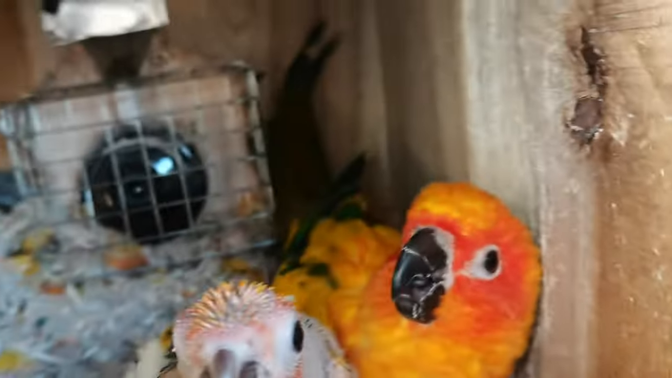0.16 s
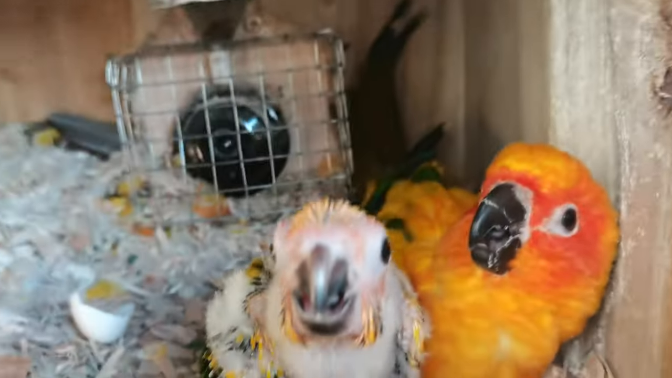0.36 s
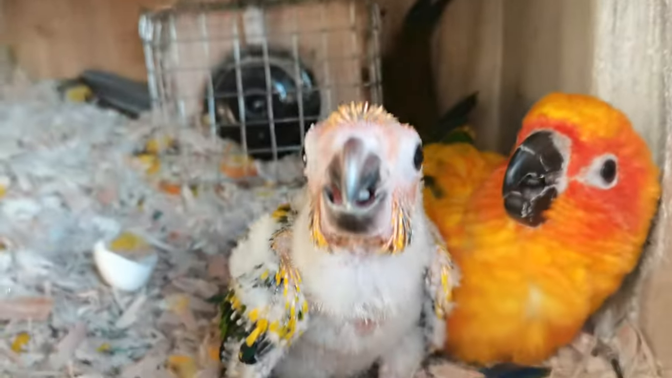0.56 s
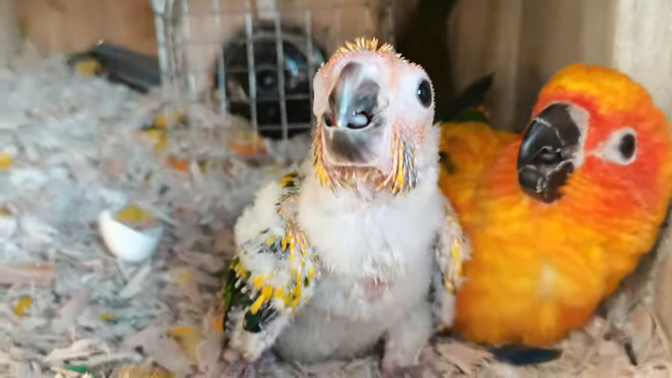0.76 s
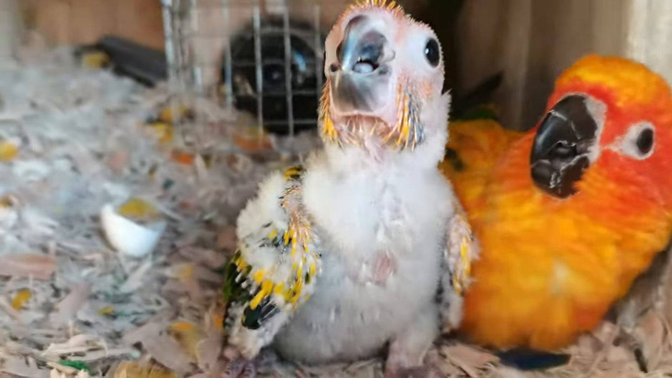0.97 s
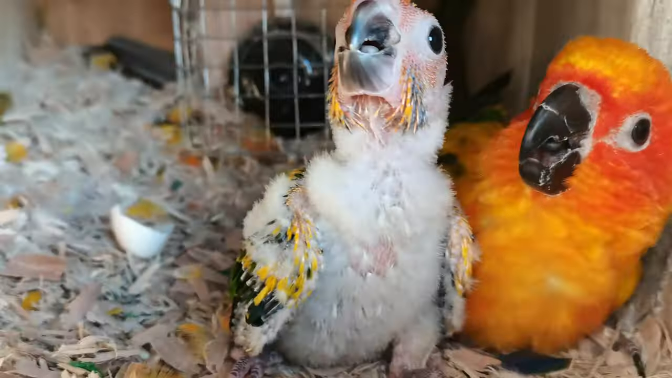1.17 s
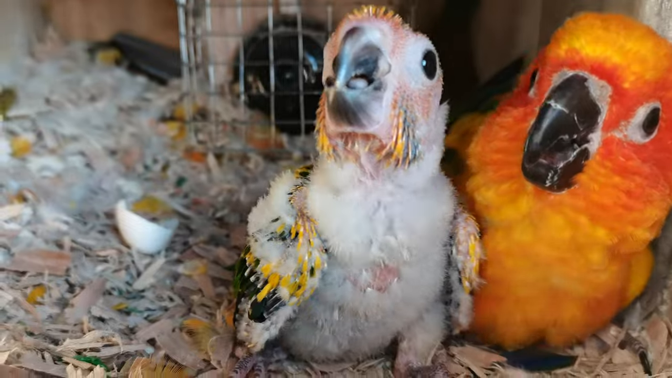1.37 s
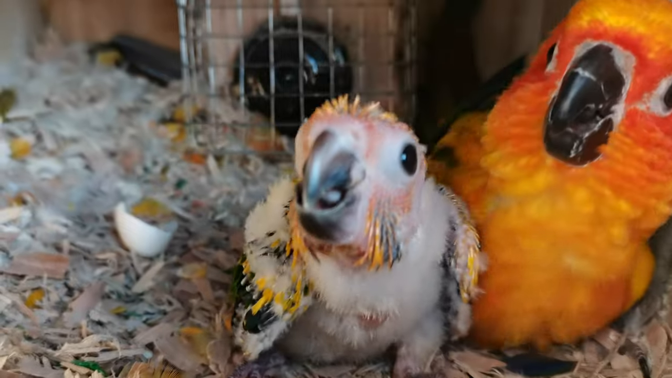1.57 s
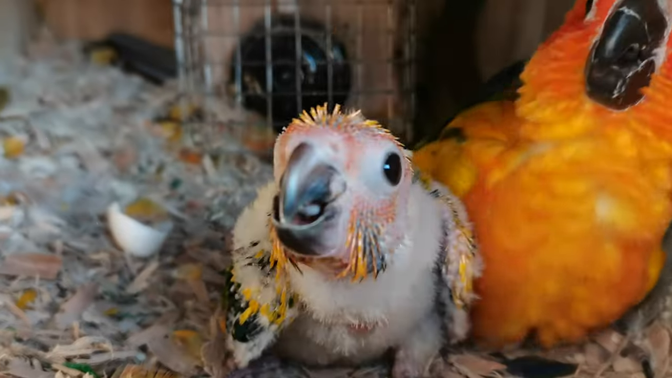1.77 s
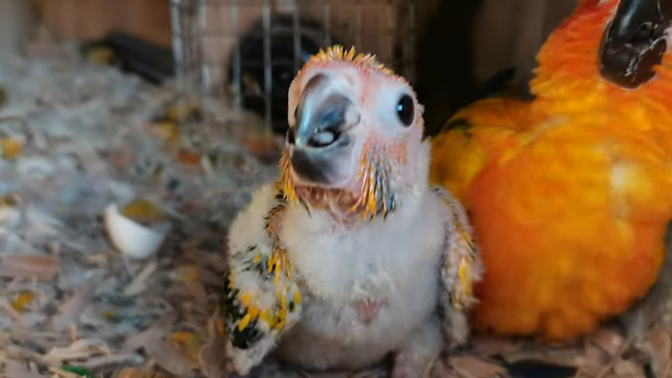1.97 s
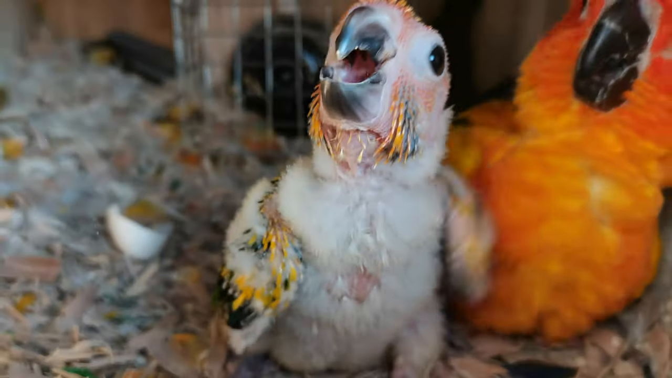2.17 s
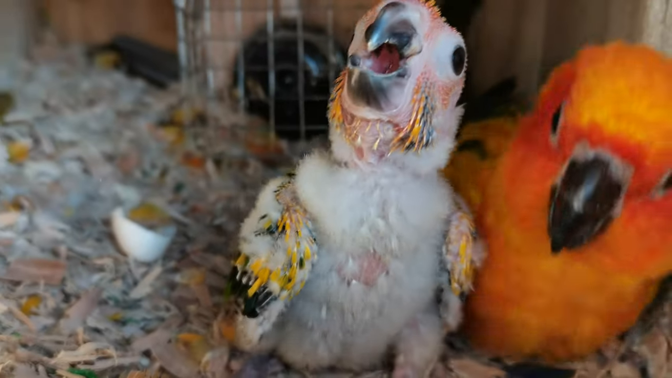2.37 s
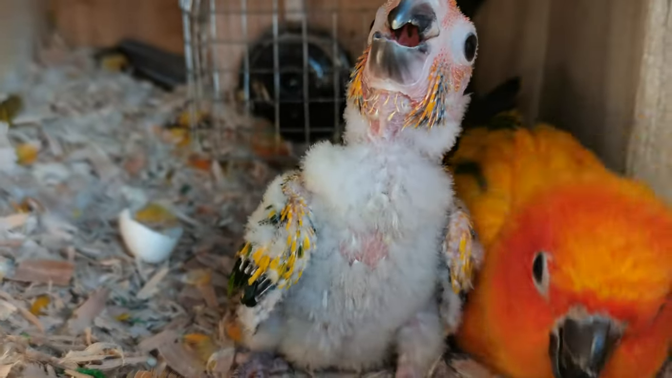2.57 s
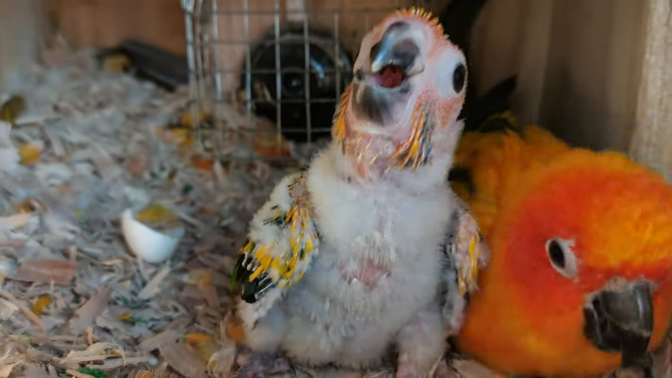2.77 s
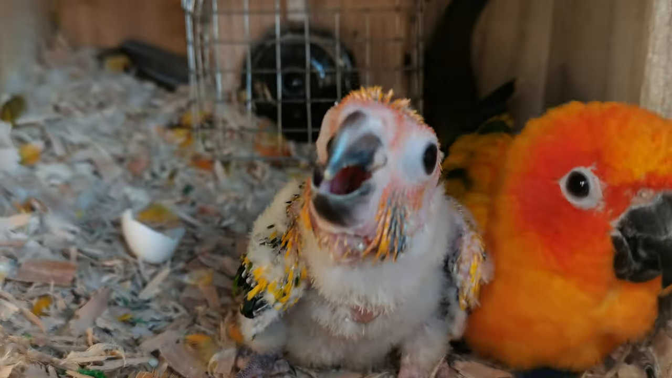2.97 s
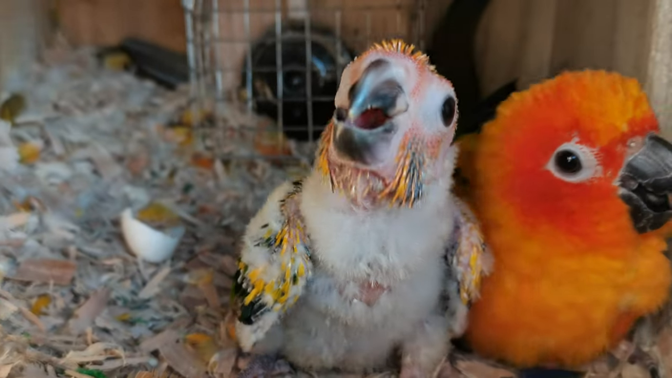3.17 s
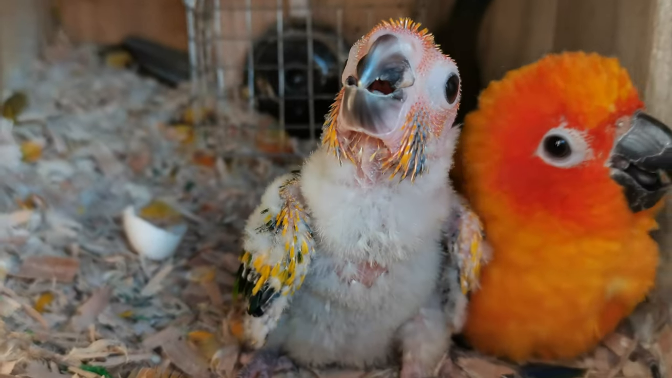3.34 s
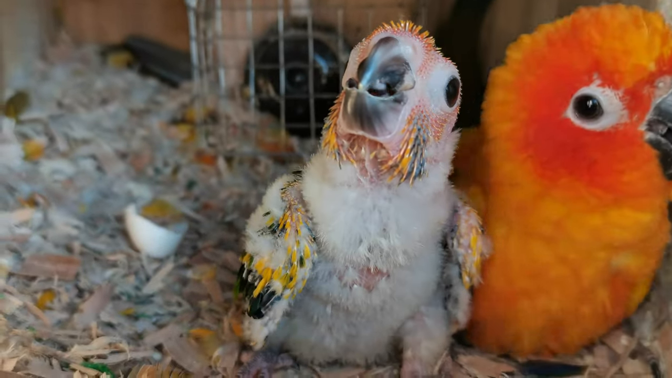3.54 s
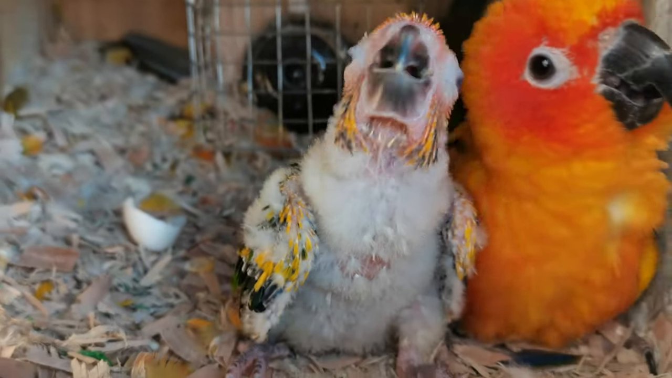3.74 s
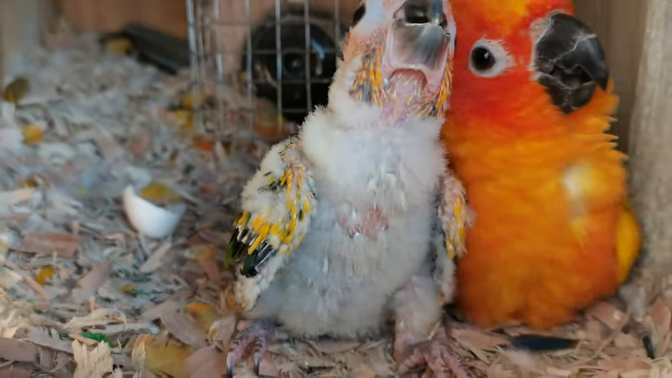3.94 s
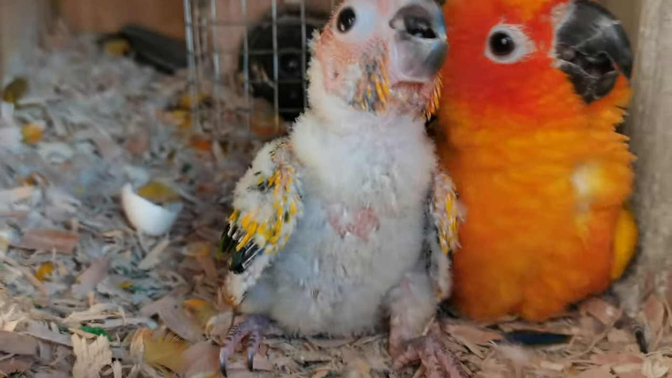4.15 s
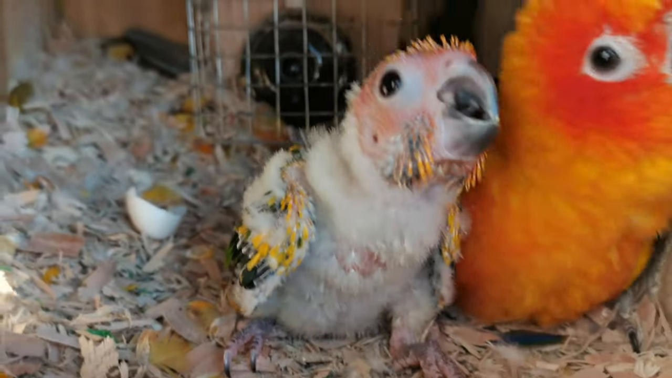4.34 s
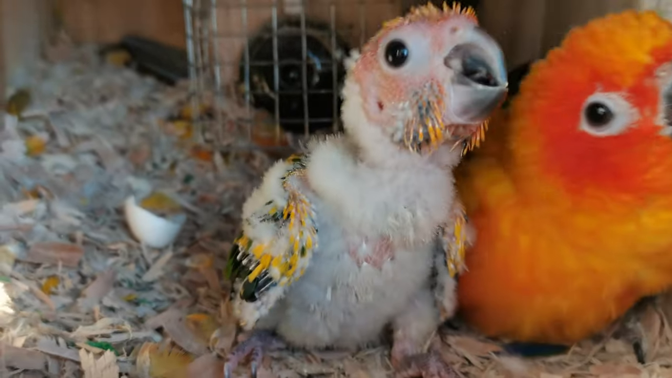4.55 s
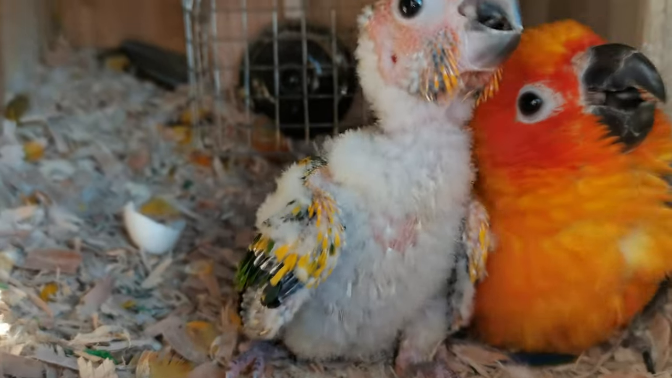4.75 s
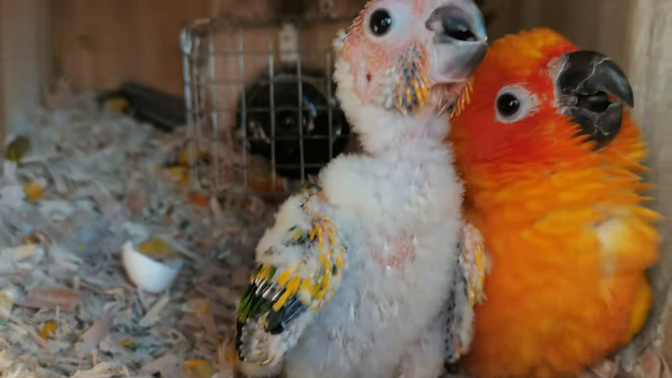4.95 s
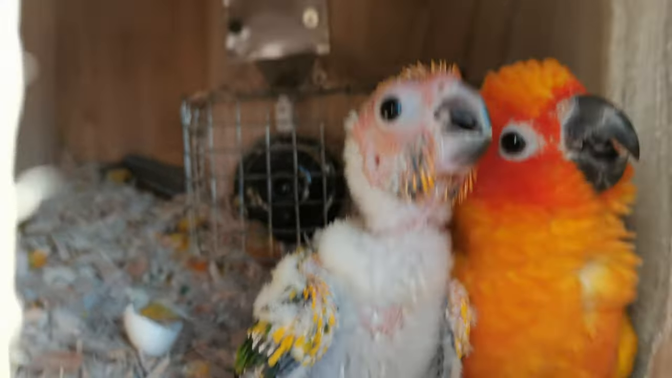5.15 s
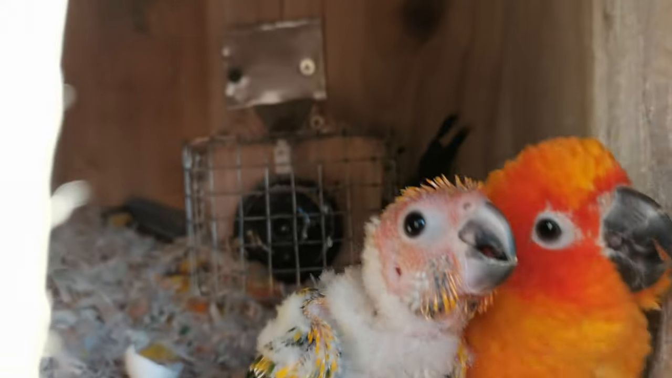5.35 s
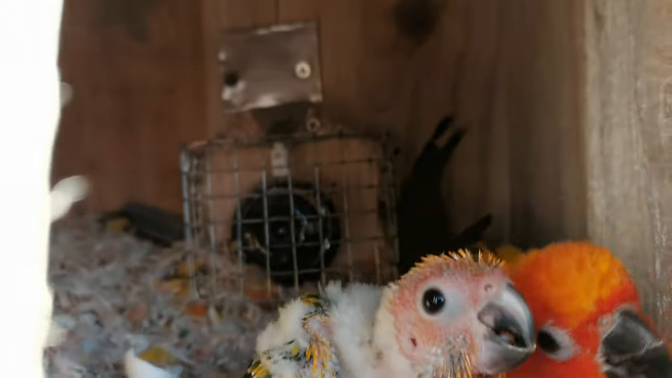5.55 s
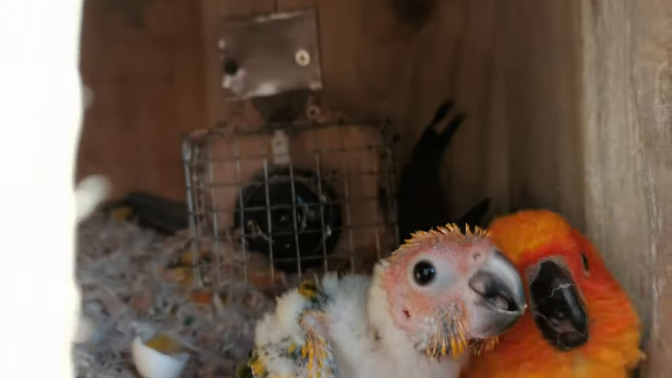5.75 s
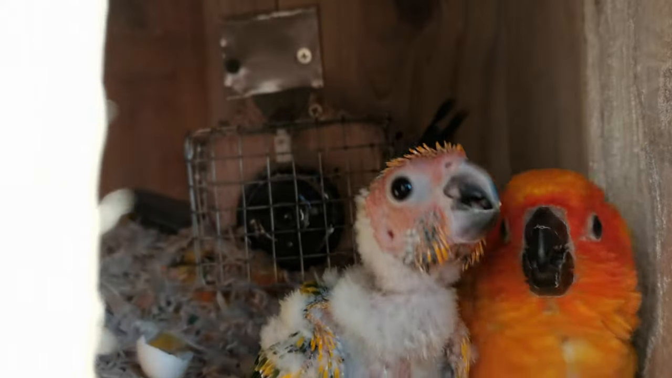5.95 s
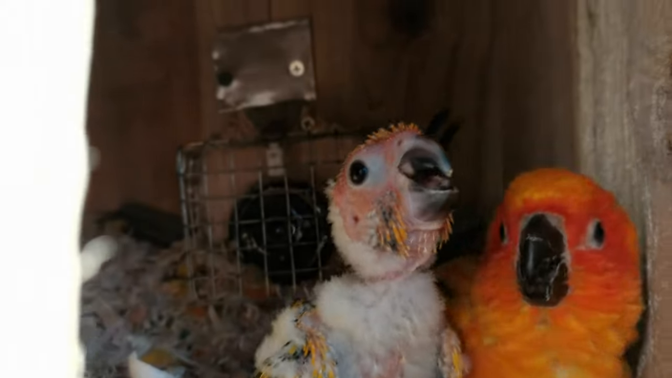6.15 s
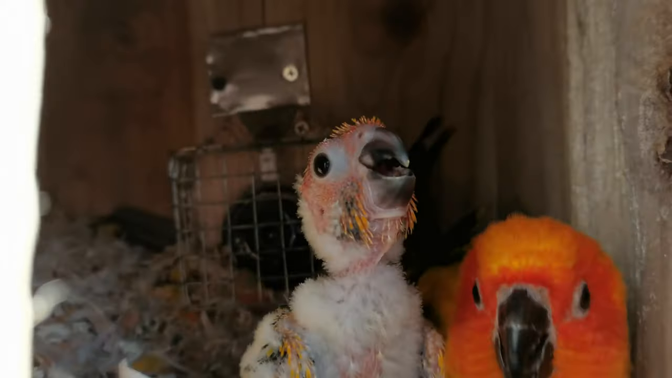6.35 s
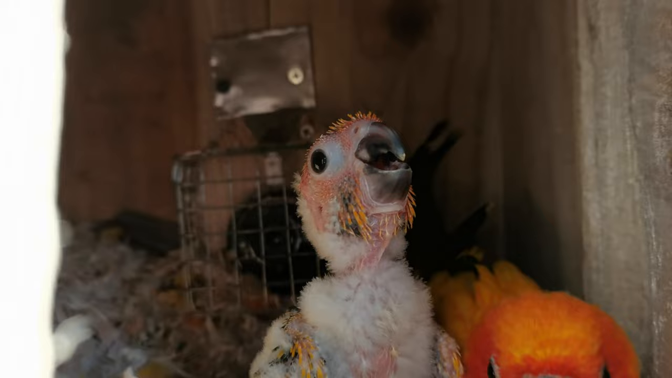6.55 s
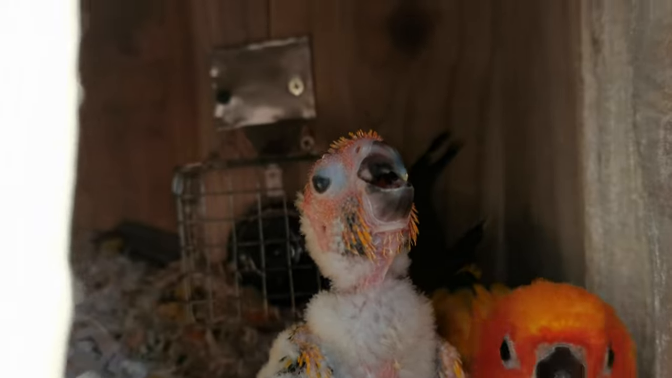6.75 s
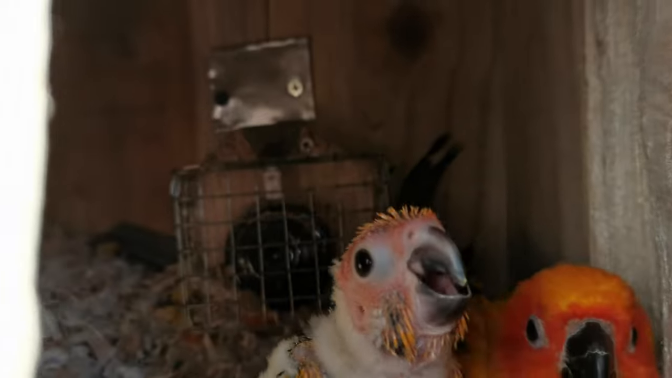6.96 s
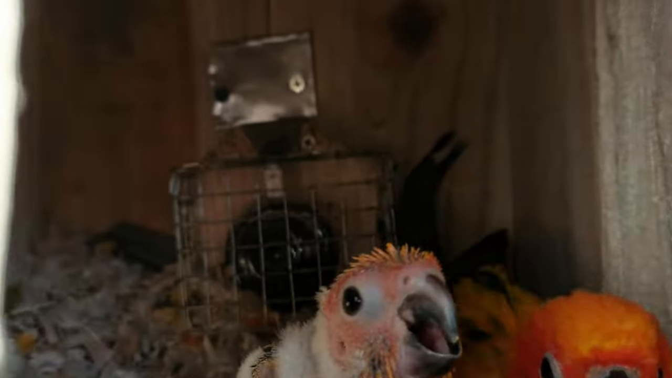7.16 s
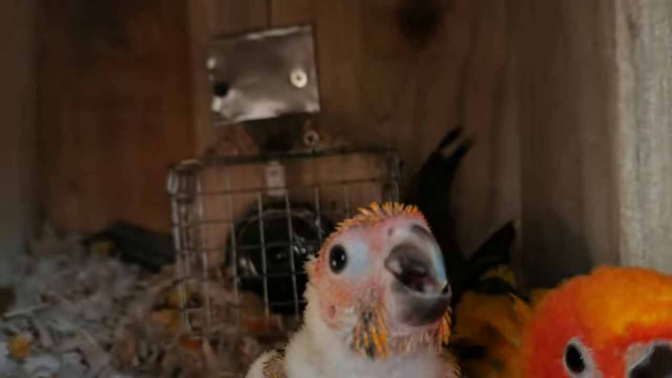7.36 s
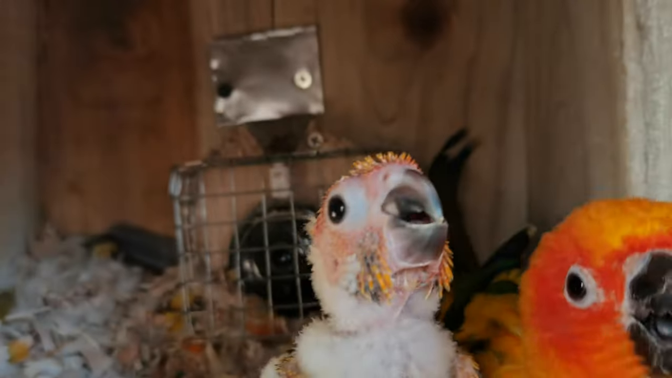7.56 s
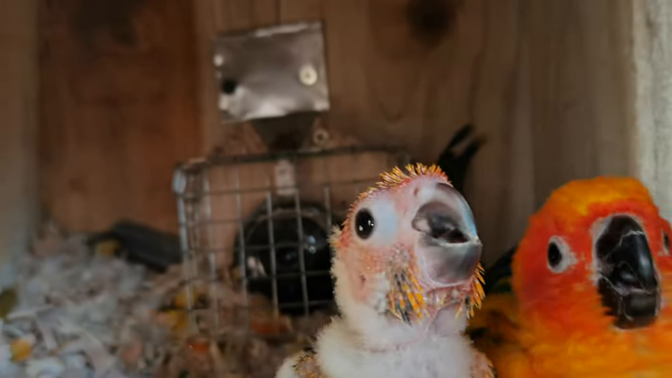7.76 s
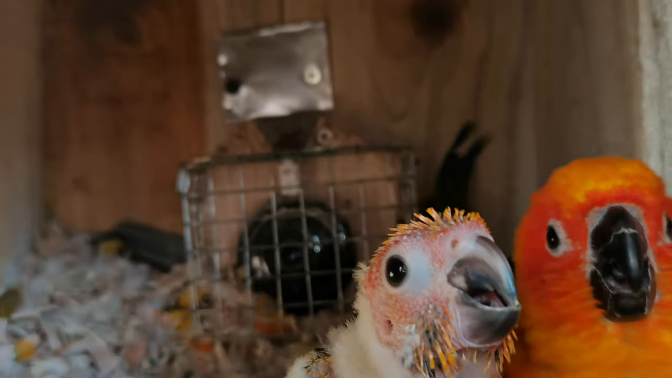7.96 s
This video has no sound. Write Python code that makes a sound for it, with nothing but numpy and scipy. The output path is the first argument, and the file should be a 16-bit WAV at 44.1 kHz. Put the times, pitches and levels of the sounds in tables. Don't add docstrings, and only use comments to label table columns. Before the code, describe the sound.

A parrot chick in a wooden nest box gives two bouts of fast hoarse begging rasps while an adult growls and other parrots screech far off.

```python
import sys
import numpy as np
from scipy import signal
from scipy.fft import rfft, irfft
from scipy.io import wavfile
from scipy.ndimage import uniform_filter1d, minimum_filter1d, map_coordinates

SR = 44100
rng = np.random.default_rng(int(sys.argv[2]) if len(sys.argv) > 2 else 0)


def unload_audio(sound):
    columns = np.transpose(np.atleast_2d(sound))
    steps = np.round(np.clip(columns, -1, 1) * 32767)
    wavfile.write(sys.argv[1], SR, steps.astype(np.int16))


def nominal_scale(level):
    x = np.asarray(level, float) / 20
    return 10 ** x


N = 353682
SNAP_S = 0.012


def times():
    return np.arange(N) / SR


def rms_one(x):
    return x / np.sqrt(np.mean(x ** 2) + 1e-20)


def follow(table):
    return np.interp(times(), *np.transpose(table))


def wobble(size, hz):
    noise = rng.standard_normal(size + 2000)
    return rms_one(signal.lfilter(*signal.butter(2, hz, fs=SR), noise)[2000:])


def resonance(x, hz, width):
    r = np.exp(-np.pi * width / SR)
    zeros = (1 - r * r) / 2 * np.array([1, 0, -1])
    return signal.lfilter(zeros, [1, -2 * r * np.cos(2 * np.pi * hz / SR), r * r], x)


def double_resonance(x, hz, width):
    return resonance(resonance(x, hz, width), hz, width)


def coloured(spectrum, alike):
    hz, db = np.transpose(spectrum)
    bin_hz = np.arange(N // 2 + 1) * SR / N
    gain = nominal_scale(np.interp(np.log(bin_hz + 1), np.log(hz), db, left=-90, right=-90))
    mid, side = irfft(rfft(rng.standard_normal((2, N))) * gain, N)
    alike = np.clip(alike, 0, 1)
    return rms_one(np.sqrt(1 + alike) * mid + np.sqrt(1 - alike) * side * [[1], [-1]])


def add(track, s, sound):
    at = round(s * SR)
    track[at:at + len(sound)] += sound[:N - at]


def bent(x, speed):
    return map_coordinates(x, [np.cumsum(speed * np.ones(len(x)))], order=3, mode="constant")


def rumble():
    # [time_s, level_db]
    rumble_level = [(0.0, -54.5), (0.94, -53), (8.02, -58.5)]
    # [frequency_hz, density_db per Hz]
    rumble_colour = [(20, -6), (45, -4), (85, -1), (150, -5), (220, -5.5), (300, -16), (420, -37)]
    return nominal_scale(follow(rumble_level) + 2.5) * coloured(rumble_colour, alike=0.83)


def far_air():
    # [time_s, level_db]
    air_level = [(0, -40), (.35, -52), (1, -48), (2, -48), (3.6, -44.5), (4.8, -44), (5.05, -52),
                 (5.3, -48), (5.6, -55), (5.9, -40), (7.6, -47.5), (8.02, -51.5)]
    # [frequency_hz, density_db per Hz]
    air_colour = [(1500, -12), (2500, 7), (5000, 3), (8000, 4), (11000, -6.5), (13000, -7), (15500, -24)]
    return nominal_scale(follow(air_level) + 1.94 * wobble(N, 23)) * coloured(air_colour, alike=0.019)


def street():
    # [time_s, level_db]
    street_level = [(0, -57.5), (.4, -52.5), (2, -52), (3.6, -55), (4.6, -60.5), (5.0, -52.5), (5.6, -56.5),
                    (6.302, -52.5), (8.02, -53.5)]
    # [frequency_hz, density_db per Hz]
    street_colour = [(300, -13.5), (450, -6), (700, -9), (1100, 0), (1500, -2.5), (2500, -2)]
    return nominal_scale(follow(street_level)) * coloured(street_colour, alike=0.12)


def motor():
    # [time_s, mean_hz, level_db, hunting_depth_hz]
    drone_marks = [(0, 142.9, -46, 7.5), (.7, 150, -44.5, 12.5), (2.7, 153, -45, 17), (3.05, 167, -44, 6.5),
                   (3.701, 166, -43, 5), (3.9, 149.9, -51, 3), (4.35, 139, -59, -1), (4.5, 138, -86, 2.5),
                   (6.0, 139.4, -76, -1.5), (6.2, 138.7, -53.5, -13), (6.58, 140.6, -41, -2),
                   (7.0, 161, -43.5, -2), (7.28, 147.8, -47.5, -2), (7.45, 133, -57, 3),
                   (7.7, 134, -70, 0.5)]
    # [time_s, level_db]
    low_tone = [(0.0, -67), (1.69, -44), (3.2, -73)]
    hunt_s, hunt_top_s, labour_db_per_hz = 0.54, 0.78, 0.12
    t = times()
    s, *columns = np.transpose(drone_marks)
    hz, db, depth_hz = [np.interp(t, s, column) for column in columns]
    hunt_hz = depth_hz * np.cos(2 * np.pi * (t - hunt_top_s) / hunt_s)
    level = nominal_scale(db - labour_db_per_hz * hunt_hz + 3.7 * wobble(N, 11.5))
    drone = level * np.sin(2 * np.pi * np.cumsum(hz + hunt_hz) / SR)
    low_level = nominal_scale(np.interp(t, *np.transpose(low_tone), right=-99))
    low = low_level * np.sin(2 * np.pi * 109.6 * t)
    sub_level = nominal_scale(-63.5 + 6.2 * wobble(N, 1.5))
    sub = sub_level * np.sin(2 * np.pi * np.cumsum(75.6 + 3.18 * wobble(N, 1.486)) / SR)
    return np.sqrt(2) * (drone + low + sub)


def aviary(x, wet_db):
    t60_s = 0.37
    t = np.arange(round(.6 * SR)) / SR
    decay = nominal_scale(-60 * t / t60_s) * np.minimum(t / 0.00097, 1)
    tail = rng.standard_normal((2, len(t))) * decay
    tail = tail / np.sqrt(np.sum(tail ** 2, axis=1, keepdims=True))
    return x + nominal_scale(wet_db) * signal.fftconvolve(x[None], tail, axes=1)[:, :N]


def shaky(hz, size, rough):
    turns = np.cumsum(hz * (1 + 0.01194 * wobble(size, 26.2)) + 55 * wobble(size, 570)) / SR
    skirt = rms_one(double_resonance(rng.standard_normal(size), hz, 600))
    return np.sin(2 * np.pi * turns) * (1 + 0.5 * wobble(size, 810)) + rough * skirt


def screech(size, hz, upper_db, upper_hz):
    breath = double_resonance(rng.standard_normal(size), 10080, 1900)
    breath = resonance(breath, 12700, 4200)
    rough = np.clip(nominal_scale(upper_db + 9.0), .1, .9)
    beak_hz = upper_hz * (1 + 0.01203 * rng.standard_normal())
    lines = [(hz * 0.92, upper_db - 22.0), (hz, 0), (beak_hz, upper_db), (hz * 1.5, upper_db - 7.5),
             (hz * 2, upper_db - 5.5), (hz * 2.5, upper_db - 15.5)]
    partials = sum(nominal_scale(line_db) * shaky(line_hz, size, rough) for line_hz, line_db in lines)
    return nominal_scale(upper_db - 3) * rms_one(breath) + partials


def flock():
    # [start_s, peak_db, second_partial_hz, brightness_db]
    dull_bird = [(0.0, -45, 4690, -4), (0.0718, -41.5, 4980, 0.5), (0.541, -31.5, 3980, -9),
                 (0.6386, -36.5, 4630, -4.5), (.7297, -39, 4740, -4.5), (1.2446, -44.5, 4234, -4.5),
                 (1.495, -51, 3930, -16), (3.098, -40, 4170, -6.5), (3.308, -40, 4220, -5),
                 (3.4392, -41.5, 4180, -13), (3.5034, -37, 4430, -3.5), (3.5742, -37, 4160, -2.5),
                 (3.7397, -48, 4620, 3.5), (3.8802, -49.5, 5440, -1.5), (4.0292, -42, 3935, -3.5),
                 (4.1763, -40, 4150, 4), (4.269, -43.5, 4480, 1.5), (4.414, -37, 5190, 0),
                 (4.553, -40, 5260, 0.5), (4.8002, -50, 5130, -2), (4.929, -52, 4000, -18),
                 (5.92, -37.5, 3790, -4), (6.32, -42.5, 4210, 2.5), (6.41, -48, 4430, -17),
                 (6.489, -33, 5050, -2), (6.721, -46, 4600, -6), (7.7196, -41.5, 3955, -13.5)]
    mellow_bird = [(5.389, -49, 4540, 1), (5.571, -66.5, 4560, 12), (5.71, -37.5, 4920, -2.5),
                   (5.8152, -34.5, 4234, -1.5)]
    middle_bird = [(0.168, -37.5, 5270, -7.5), (0.4283, -42, 3460, -3), (0.491, -43, 3425, -2.5),
                   (1.1276, -35, 4374, -12), (1.879, -50, 3520, -7), (6.609, -36, 5030, -10),
                   (7.541, -43.5, 3780, -0.5), (7.621, -41, 4550, -7.5)]
    shrill_bird = [(0.8143, -37, 4220, -6), (.92, -36.5, 4440, -8.5), (1.0051, -39.5, 4370, -50),
                   (1.066, -37.5, 4300, -11.5), (1.358, -40, 3840, -28), (1.6571, -50, 3820, 1),
                   (1.7553, -37, 4144, -5), (4.3761, -43.5, 4280, 4.5), (4.6697, -35, 5050, -6),
                   (5.114, -47.5, 4690, -6.5), (5.183, -38, 4360, -6), (7.404, -39.5, 4970, -5),
                   (7.4691, -40, 3920, -1), (7.966, -62, 4460, 6)]
    bird_upper_hz = [6025, 6580, 7020, 7690]
    # [start_s, peak_db, pitch_hz]
    flock_low = [(0.0722, -47, 2555), (0.1598, -52, 2230), (0.488, -53, 2414), (0.731, -52.5, 2427),
                 (0.921, -52, 3250), (1.2505, -54.5, 2146), (1.83, -51.5, 2240), (3.4998, -46.5, 2472),
                 (3.576, -42.5, 3087), (3.7447, -54, 2204), (4.0304, -60, 2890), (4.1635, -43.5, 2480),
                 (4.2698, -70, 2280), (4.3777, -41.5, 2603), (4.552, -48.5, 2580), (4.6782, -44.5, 2457),
                 (4.798, -50, 2560), (5.1785, -55, 2600), (5.7203, -59, 2017), (5.8238, -46, 2650),
                 (5.9195, -42.5, 3250), (7.4194, -48.5, 2456), (7.5278, -49.5, 2700), (7.619, -52, 2740)]
    rise, rise_s, sag_per_s = .1, .01507, .402
    out = np.zeros(N)
    t = np.arange(round(.13 * SR)) / SR
    shape = np.sin(np.pi / 2 * np.minimum(t / .024, 1)) ** 2 * np.exp(-(t / 0.05) ** 2)
    glide = 1.02 - rise * np.exp(-t / rise_s) - sag_per_s * t
    for calls, upper_hz in zip([dull_bird, mellow_bird, middle_bird, shrill_bird], bird_upper_hz):
        for s, db, hz, upper_db in calls:
            voice = screech(len(t), hz, upper_db, upper_hz)
            add(out, max(s - .01, 0), nominal_scale(db - 3.0) * shape * bent(voice, glide))
    for s, db, hz in flock_low:
        add(out, s - .01, nominal_scale(db - 1.5) * shape * bent(shaky(hz, len(t), rough=1.0), glide))
    return out


def nest_box(x, pan_db, lag_ms):
    # [delay_ms, gain]
    box = [
        [(1.3, 0.15), (2.9, -0.27), (5.1, 0.15), (8.3, -0.12)],
        [(.9, -0.59), (2.2, 0.14), (4.3, 0.36), (7.1, -0.44)],
    ]
    treble_pan_share = 0.53
    out = np.zeros((2, N))
    treble = signal.sosfiltfilt(signal.butter(2, 8550, "high", fs=SR, output="sos"), x)
    for port, (echoes, sign, late_ms) in enumerate(zip(box, [1, -1], [0, lag_ms])):
        heard = nominal_scale(sign * pan_db / 2) * (x - treble)
        heard = heard + nominal_scale(sign * treble_pan_share * pan_db / 2) * treble
        for ms, gain in [(0.0059, 1)] + echoes:
            lag = round((ms + late_ms) * SR / 1000)
            out[port, lag:] += gain * heard[:N - lag]
    return out


def scuff():
    start_s, length_s, level_db = .4, .069, -52.5
    rub = resonance(rng.standard_normal(N), 940, 800) * nominal_scale(4.3 * wobble(N, 60))
    return nominal_scale(level_db) * rms_one(rub) * np.exp(-((times() - start_s) / length_s) ** 2)


def claws():
    # [start_s, thud_db, pitch_hz, click_over_thud_db]
    knocks = [
        (0.307, -33, 210, -19),
        (0.357, -35, 210, -20),
        (0.423, -36, 223, -18),
        (4.818, -66, 252, -1),
        (4.948, -36.5, 306, -3),
        (7.963, -48.5, 410, 8.5),
    ]
    out = np.zeros(N)
    t = np.arange(round(0.07 * SR)) / SR
    for s, db, hz, click_db in knocks:
        click = double_resonance(rng.standard_normal(len(t)), 710, 2800) * np.exp(-t / 0.0079)
        thud = np.sin(2 * np.pi * hz * t) * np.exp(-t / 0.0083)
        add(out, s, nominal_scale(db) * (thud + 3 * nominal_scale(click_db) * click))
    return out


def beats(marks):
    beat_s = .0215
    marks = np.array(marks)
    number = np.cumsum(np.round(np.diff(marks[:, 0], prepend=marks[0, 0]) / beat_s))
    return [[np.interp(n, number, column) for column in marks.T] for n in np.arange(number[-1] + 1)]


def adult():
    # [time_s, peak_db, pitch_hz, overtones_db]
    growl_a = [(2.279, -26, 626, -12), (2.317, -20, 644, 1), (2.443, -18, 870, 1), (2.467, -18, 900, 3.5),
               (2.686, -17, 950, 7.5), (2.886, -18, 1024, 3.5), (3.085, -18.5, 1040, 9.5),
               (3.222, -20, 884, 8)]
    growl_b = [(6.724, -22, 1090, 2), (6.897, -14.5, 1000, 5), (7.024, -15, 960, 5.5),
               (7.202, -17, 940, 5.5), (7.271, -19, 896, 2), (7.298, -20, 920, -31), (7.392, -23, 900, -2)]
    # [time_s, peak_db]
    growl_end = [(3.267, -21.5), (3.286, -18.5), (3.307, -23), (3.36, -27.5), (3.375, -29), (3.381, -25),
                 (3.388, -23.5), (3.399, -23), (3.405, -22), (3.41, -20), (3.418, -27), (3.424, -21)]
    growl_tries = [(2.183, -32), (6.273, -41), (6.293, -23.5), (6.339, -32), (6.362, -25.5), (6.413, -28),
                   (6.522, -23), (6.549, -24.5), (6.665, -41)]
    # [pitch_hz, overtones_db]
    loose_throat = [(939, 7.5), (920, 7.5)]
    # [frequency_hz, width_hz, level_db]
    growl_partials = [(654, 424, -10), (900, 536, 2.5), (1178, 435, -0.5), (1995, 510, -8.5),
                      (2870, 510, -16), (3810, 730, -6.5), (4600, 1400, -7), (6050, 4000, -16),
                      (7100, 1650, -5.5), (10500, 720, -28.5)]
    pulses = np.full((2, N), 1e-18)
    k = np.arange(14)
    strength = np.exp(-((k - 2.2) / 1.67) ** 2) + 0.078 * (k > 3)
    loose = []
    for rows, throat in zip([growl_end, growl_tries], loose_throat):
        loose += [(*beat, *throat) for beat in rows]
    for s, db, pitch_hz, gape_db in beats(growl_a) + beats(growl_b) + loose:
        timing, force = rng.standard_normal((2, len(k)))
        at = (s + .0004 * timing[-1] + (k + 0.13 * timing) / pitch_hz) * SR
        burst = nominal_scale(db + 2.0 * force + 0.77 * rng.standard_normal()) * strength
        pulses[:, at.astype(int)] += burst * nominal_scale(np.array([[0], [gape_db]]))
    voice = np.zeros(N)
    for i, (hz, width, db) in enumerate(growl_partials):
        ring = double_resonance(pulses[int(i > 2)], hz, 1.18 * width)
        voice += (-1) ** i * nominal_scale(db) * SR / width * ring
    return nominal_scale(-16) * signal.sosfilt(signal.butter(2, 480, "high", fs=SR, output="sos"), voice)


def rasp(length, early_db, late_db, hz, chest_db, low_db, top_db, jitter, shake_db, hiss):
    # [share of second partial, width_hz, level_db]
    windpipe = [(0.536, 312, -4.5), (0.759, 770, -1), (.9, 600, 2), (1.022, 433, 3)]
    # [frequency_hz, width_hz, level_db]
    beak = [(5160, 2900, -13.5), (7530, 1400, -9.5), (9810, 1630, -11.5), (11090, 1500, -22.5),
            (14200, 1800, -21)]
    glide_up, glide_up_s, glide_down, glide_down_s = .1, .004, .1125, .006
    t = np.arange(round((length + 0.011) * SR)) / SR
    unsteady = 1 + jitter * wobble(len(t), 700) + .03 * wobble(len(t), 40)
    cycles = np.cumsum(hz / 2 * unsteady) / SR
    strong_weak = 1 + 0.3 * (-1) ** np.floor(cycles)
    pulses = np.diff(np.floor(cycles), prepend=0) * strong_weak * nominal_scale(shake_db * wobble(len(t), 1420))
    source = rms_one(pulses) + hiss * rng.standard_normal(len(t))

    modes = [(hz / 4, 350, chest_db)]
    modes += [(share * hz, width, gain_db) for share, width, gain_db in windpipe]
    modes += beak
    chance_db = rng.normal(0, 1.01, len(modes))
    chance_db[[0, 1, -1]] += [-14 * (length < SNAP_S), low_db, top_db]
    shift = 1 + 0.011 * rng.standard_normal(len(modes))
    voice = np.zeros(len(t))
    for k, (f, width, gain_db) in enumerate(modes):
        voice += (-1) ** k * nominal_scale(gain_db + chance_db[k]) * double_resonance(source, f * shift[k], width)

    slide = glide_up * np.exp(-t / glide_up_s) + glide_down * np.exp((t - t[-1]) / glide_down_s)
    voice = bent(voice, 1 - (length > SNAP_S) * slide)
    throb = nominal_scale(2.78 * wobble(len(t), 400))
    corners = np.array([0, .003, 0.0054 + 0.33 * length, 0.001 + 0.8 * length, 0.00091 + length,
                        length + 0.0062, length + 0.074])
    level_db = [early_db - 38, early_db - 5, early_db + 2, late_db + 1.5, late_db - 7.0,
                late_db - 18.0, late_db - 2]
    return rms_one(voice * throb) * nominal_scale(np.interp(t, corners, level_db))


def chick(calls, chest_db):
    # [time_s, second_partial_hz, neck_band_db, first_partial_db]
    chick_pitch = [(2.01, 3520, 4, -6), (2.032, 4300, -0.5, -5), (2.171, 4460, 2.5, 3.5),
                   (2.33, 4396, 2.5, 1), (2.48, 4330, 4, -0.5), (2.571, 4290, 8.5, -2), (2.7, 4180, 7.5, 2),
                   (2.88, 4214, 6.5, -0.5), (3.052, 4267, 4, -2.5), (5.98, 3590, 1, 2.5),
                   (6.07, 3997, -1.5, 1.5), (6.3, 3729, 0, 4.5), (6.521, 3760, -0.5, -2),
                   (6.669, 3798, -1.5, 1), (6.829, 3830, -3.5, -2), (6.99, 4054, 0, 0),
                   (7.14, 4210, -2, -3), (7.23, 4040, 3.5, -7)]
    # [time_s, level_db]
    whistle = [(2.01, -14), (2.3, -10), (2.5, 0.5), (3.05, 1), (5.98, -12), (6.25, -2.5), (6.5, 1),
               (7.0, 0.5), (7.1, -7), (7.23, -12)]
    out = np.zeros(N)
    marks, pitch_hz, neck_db, first_db = np.transpose(chick_pitch)
    for s, length, db in calls:
        swell_db = 0.8 if length > SNAP_S else -3.5
        half_db = (swell_db + rng.standard_normal()) / 2
        hz, low_db = np.interp(s, marks, pitch_hz), np.interp(s, marks, first_db)
        top_db = np.interp(s, *np.transpose(whistle))
        call = rasp(length, db - half_db, db + half_db, hz, chest_db, low_db, top_db,
                    jitter=.045, shake_db=3.0, hiss=.25)
        add(out, s - .003, call)
    neck_gain = nominal_scale(np.interp(times(), marks, neck_db)) - 1
    return out + neck_gain * resonance(out, 2920, 900)


def scene():
    # [start_s, length_s, level_db]
    rasps_a = [(2.010, 0.012, -35.5), (2.032, 0.0072, -26), (2.049, 0.0037, -46), (2.067, 0.0044, -34),
               (2.083, 0.0035, -49), (2.093, 0.0093, -32), (2.106, 0.011, -17.5), (2.119, 0.024, -26),
               (2.168, 0.047, -20), (2.247, 0.0066, -17.5), (2.259, 0.031, -19.5), (2.327, 0.038, -16.5),
               (2.406, 0.04, -17.5), (2.481, 0.04, -17.5), (2.564, 0.036, -18), (2.639, 0.04, -22),
               (2.721, 0.034, -19.5), (2.798, 0.042, -21), (2.878, 0.036, -19), (2.961, 0.037, -18),
               (3.041, 0.037, -18)]
    rasps_b = [(5.980, 0.021, -35.5), (6.004, 0.021, -26), (6.067, 0.025, -20), (6.130, 0.038, -21.5),
               (6.207, 0.036, -20.5), (6.286, 0.038, -22), (6.360, 0.042, -21), (6.442, 0.036, -17.5),
               (6.515, 0.037, -18.5), (6.595, 0.039, -16), (6.674, 0.038, -16.5), (6.751, 0.037, -14.5),
               (6.828, 0.033, -15), (6.904, 0.035, -14), (6.982, 0.029, -12.5), (7.054, 0.034, -13),
               (7.140, 0.024, -9.5), (7.227, 0.032, -17)]
    # [time_s, left_over_right_db]
    chick_pan = [(2.01, 11), (3.1, 11.5), (5.98, 4), (6.9, 4.5), (7.2, 7.5)]
    low = motor() * nominal_scale(np.array([[2.5], [-3.5]])) + rumble() * nominal_scale(np.array([[3.5], [-6.5]]))
    air = far_air() + street()
    birds = aviary(flock(), wet_db=9.0) * nominal_scale(np.array([[-.4], [.4]]))
    pan_db = follow(chick_pan)
    near = nest_box(claws() + scuff(), 8.6, 0.046) + nest_box(adult(), 6.0, 0.03)
    near = near + nest_box(chick(rasps_a, chest_db=-21.0), pan_db, .13)
    near = near + nest_box(chick(rasps_b, chest_db=-15), pan_db, 0.094)
    near = near + aviary(near[0], wet_db=-26) - near[0]
    return near + birds + low + air


def gated(x):
    # [frequency_hz, level_db]
    gate_marks = [(3000, -36), (6000, -30), (8200, -34), (9000, -21), (10000, -30.5), (11500, -27),
                  (12500, -21), (13800, -27), (15500, -25.5)]
    quiet_db = -65
    hz, _, frames = signal.stft(x, SR, nperseg=2048)
    bands = np.abs(frames[:, :1024]).reshape(2, 64, 16, -1) ** 2
    level = bands.mean(axis=2)
    band_hz = hz[8:1024:16]
    strongest = level[:, band_hz > 1500].max(axis=1, keepdims=True)
    strongest = np.maximum(strongest, nominal_scale(2 * quiet_db))
    limit = nominal_scale(2 * np.interp(band_hz, *np.transpose(gate_marks), left=-99))[:, None] * strongest
    limit = limit * nominal_scale(22.0 * uniform_filter1d(rng.standard_normal(level.shape), size=3))
    frames = frames[:, :1024] * np.repeat(level > limit, 16, axis=1)
    frames = np.pad(frames, ((0, 0), (0, 1), (0, 0)))
    return signal.istft(frames, SR, nperseg=2048)[1][:, :N]


def top_cut(x):
    return signal.sosfilt(signal.butter(12, 15770, fs=SR, output="sos"), x)


def record(dry):
    colour = dry - 0.55 * resonance(dry, 9050, 900)
    peak = np.abs(colour).max(axis=0) + 1e-9
    room_left = minimum_filter1d(np.minimum(1, .91 / peak), size=90)
    mix = gated(colour * uniform_filter1d(room_left, size=45))
    return top_cut(mix)


dry = scene()
out = record(dry)
unload_audio(out)
```